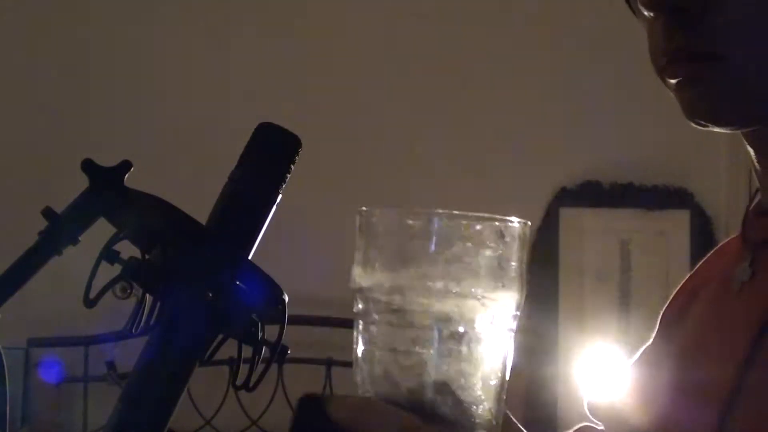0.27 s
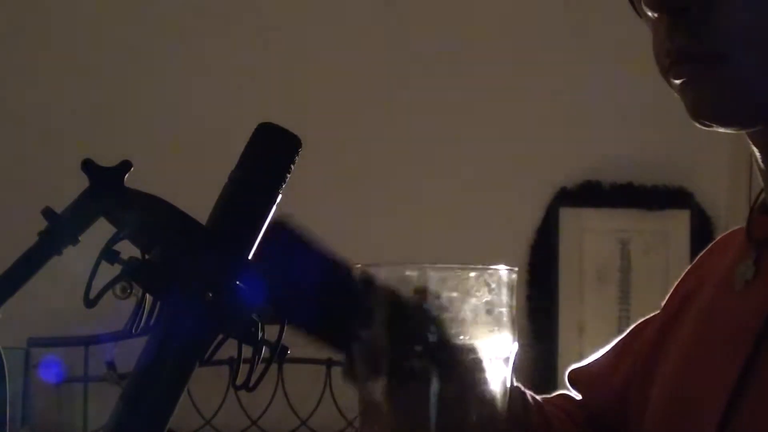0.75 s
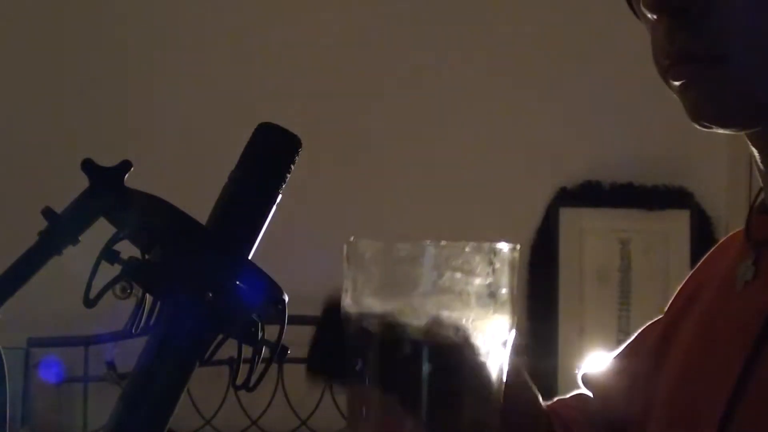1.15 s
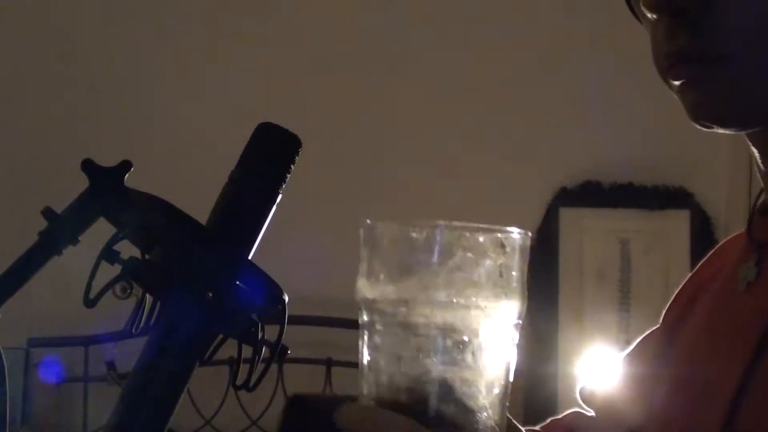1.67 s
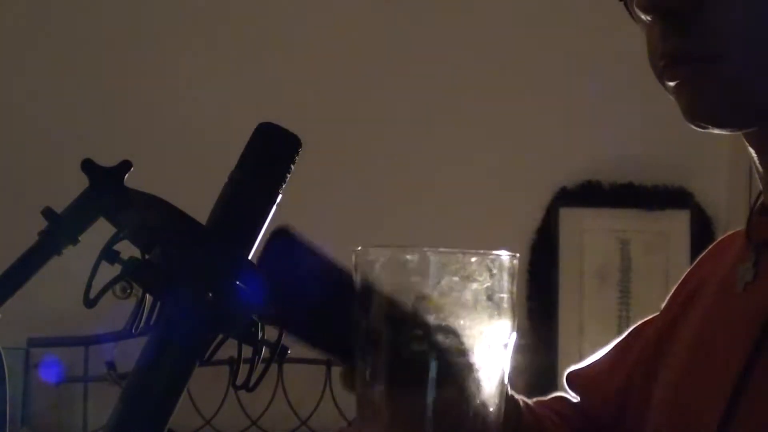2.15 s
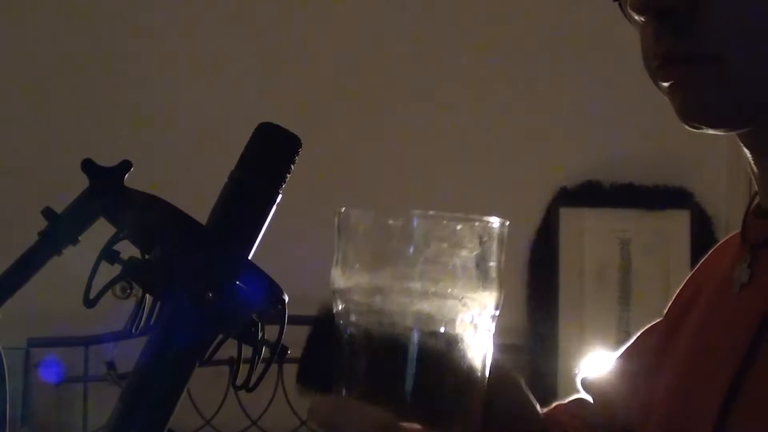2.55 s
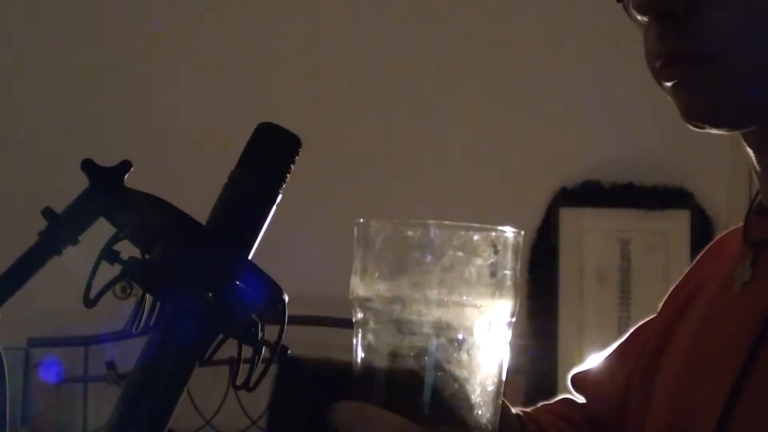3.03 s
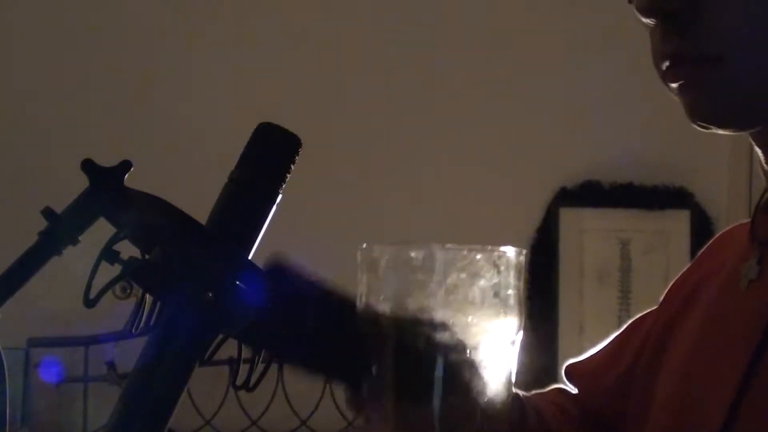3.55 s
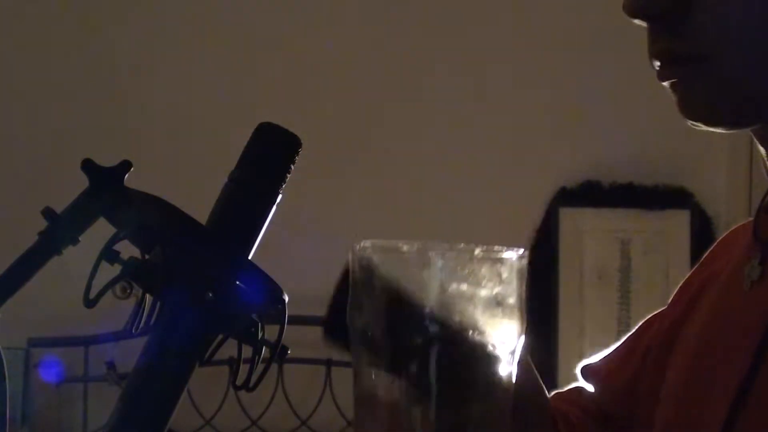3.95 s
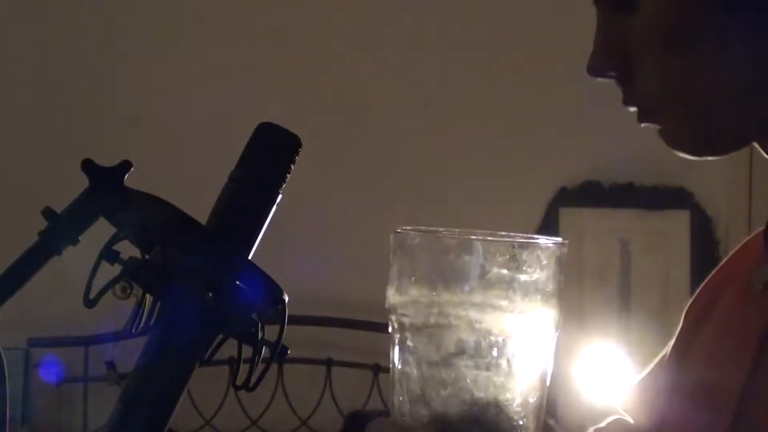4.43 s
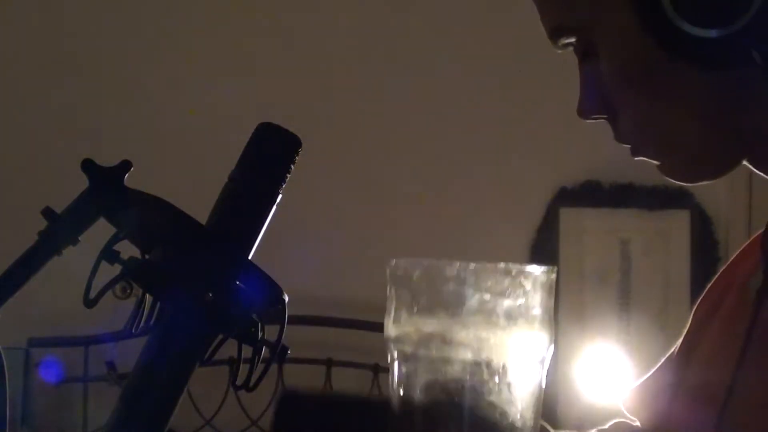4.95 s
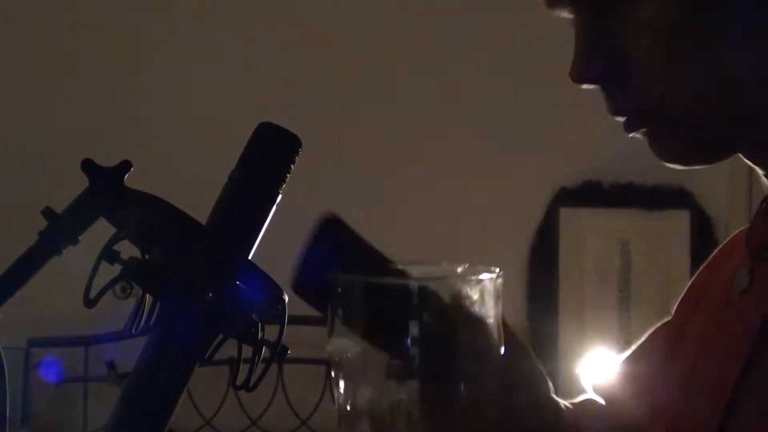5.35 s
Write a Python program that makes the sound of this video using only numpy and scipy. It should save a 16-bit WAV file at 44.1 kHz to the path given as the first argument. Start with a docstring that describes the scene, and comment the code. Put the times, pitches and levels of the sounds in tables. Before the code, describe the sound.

Close up in a quiet, small room, a hard slab is shaken in and out of a hand-held pint glass. The sound opens mid-rattle, with fast clatter until 0.1 s and an exit tap near 0.17 s. Then a cycle repeats roughly every 0.7 s: a tap on the wall at 0.52, 1.21, 1.92, 2.65, 3.30, 3.97, 4.65 and 5.31 s, a sharper rim strike about 0.07 s later, a loose burst of rattles with gritty sliding, and a tap or bouncing double tap on the way out. Rattles are strongest around 2.8, 3.5, 4.15 and 5.5 s; the shake at 4.7 s is sparser. Every hit combines a dry crack, woody mid-pitched knock, hollow air thump and short bright glass ring, always at the same pitches and often choked by the next contact. Faint low hums glide briefly at 0.7, 1.4 and 2.1 s. Soft low room hush continues underneath; the end comes during rattling.

```python
"""Slab shaken in a pint glass

Quiet room, microphone close to a hand-held pint glass; a small hard slab is shaken in and out of it.
Each shake it taps the wall going in, strikes the rim, rattles and slides, and taps the wall coming out.
Contacts damp and renew decaying glass modes, crack as noise bursts, knock slab and air resonances and puff
air out of the mouth; sliding is patchy noise, hums are gliding sines, and hush and room tail are shaped noise."""
import sys
import numpy as np
from scipy import signal
from scipy.fft import rfft, irfft, next_fast_len
from scipy.io import wavfile
from scipy.ndimage import uniform_filter1d, map_coordinates

SR = 44100
rng = np.random.default_rng(int(sys.argv[2]) if len(sys.argv) > 2 else 0)


def wrap_up_sound(samples):
    """Save the sound to the file named by the first command line argument, as 16-bit audio."""
    columns = np.atleast_2d(samples).T
    # keep every value between -1 and 1, then stretch to whole-number steps
    tamed = np.clip(columns, -1, 1)
    steps = np.round(tamed * 32767).astype(np.int16)
    wavfile.write(sys.argv[1], SR, steps)


N = 246500  # length in samples


def amp(db):
    """Gain of a dB value."""
    return 10 ** (np.asarray(db) / 20)


def unit(x):
    """x at rms 1."""
    return x / np.sqrt(np.mean(x ** 2) + 1e-20)


def along(points, hz):
    """Values at hz, interpolated between (Hz, value) points on a log frequency axis."""
    point_hz, value = np.transpose(points)
    return np.interp(np.log(hz + 1), np.log(point_hz + 1), value)


def filtered(x, response):
    """x times a complex response of frequency, zero-padded so that the end does not wrap round."""
    m = next_fast_len(len(x) + 8192)
    hz = np.fft.rfftfreq(m, 1 / SR)
    return irfft(rfft(x, m) * response(hz), m)[:len(x)]


def resonances(modes):
    """Causal response of (Hz, width Hz, dB) modes, added with alternating sign."""
    def response(f):
        total = 0
        for k, (centre, width, db) in enumerate(modes):
            band = 1j * f * width
            total = total + (-1) ** k * amp(db) * band / (centre * centre - f * f + band)
        return total
    return response


def drift(rate):
    """A random curve of straight lines between knots, rate knots a second."""
    knots = rng.standard_normal(int(N * rate / SR) + 4)
    return map_coordinates(knots, [np.arange(N) * rate / SR], order=1)


def noise(spectrum, patchy_db):
    """Coloured noise of rms 1 with time-frequency patches of random gain."""
    z = signal.stft(rng.standard_normal(N + SR // 10), nperseg=512)[2]
    field = uniform_filter1d(rng.standard_normal(z.shape), size=6, axis=0)
    field = uniform_filter1d(field, size=6, axis=1)
    x = signal.istft(z * amp(patchy_db * unit(field)), nperseg=512)[1][:N]
    return unit(filtered(x, lambda hz: amp(along(spectrum, hz))))


# The quiet room behind the glass. Each row: frequency in Hz, relative level in dB per Hz.
HUSH_SPECTRUM = [(12, -65), (20, 0.5), (85, -3.5), (308, -15.5), (374, -16.5), (553, -26), (794, -21.5),
                 (1140, -15), (2360, -29), (3580, -35.5), (4480, -29), (8500, -42.5), (15700, -41)]
HUSH_DB = -61.5  # rms level


def hush():
    """Steady background of the room: patchy noise, coloured by the hush spectrum."""
    return amp(HUSH_DB) * noise(HUSH_SPECTRUM, patchy_db=1)


# The walls around glass and microphone. Each row: frequency in Hz, time to fade by 60 dB in seconds.
ROOM_FADING = [(150, 0.13), (700, 0.16), (2000, 0.31), (5000, 0.24), (13000, 0.16)]


def room(x):
    """Each frequency of the tail dies at its own speed; the glass moves, so the tail keeps changing."""
    out, hop = np.zeros(N + 2 * SR), SR // 5
    fade = np.hanning(2 * hop + 1)[:-1]
    padded = np.pad(x, (hop, 2 * hop))
    for at in range(0, N + hop, hop):
        # a fresh random tail for each overlapping stretch
        hz, t, z = signal.stft(rng.standard_normal(SR // 2), SR, nperseg=256)
        fading = amp(-60 * t / along(ROOM_FADING, hz)[:, None])
        tail = signal.istft(z * fading, SR, nperseg=256)[1]
        wet = signal.fftconvolve(padded[at:at + 2 * hop] * fade, tail / np.linalg.norm(tail))
        out[at:at + len(wet)] += wet
    return out[hop - 150:][:N]  # the walls answer a few ms late


# Short low hums at the mouth of the glass as the slab half closes it.
# Each row: start and end in seconds, first and last frequency in Hz, peak level in dB before the waver.
MOUTH_HUMS = [(0.704, 0.758, 345, 260, -51.5), (1.383, 1.439, 227, 340, -53), (2.078, 2.145, 350, 300, -59)]


def hums():
    """Soft gliding tones of the half-closed air space, wavering in level."""
    out = np.zeros(N)
    for start, end, first_hz, last_hz, db in MOUTH_HUMS:
        n = round((end - start) * SR)
        phase = 2 * np.pi * np.cumsum(np.linspace(first_hz, last_hz, n)) / SR
        swell = np.hanning(n) ** 0.16  # nearly flat, with short ends
        out[round(start * SR):][:n] += amp(db) * swell * np.sin(phase)
    return out * amp(3 * drift(90))


# The slab sliding on the glass, close up. Each row: start, loudest moment and end in seconds,
# low rub level in dB, relative grit level in dB. A row that ends before its start stays silent;
# one that ends before its loudest moment is cut off while rising.
SLAB_SLIDES = [(0.597, 0.653, 0.75, -47, -59.5), (1.38, 1.472, 1.45, -58, -64.5),
               (2.002, 2.037, 2.145, -49.5, -59), (2.72, 2.883, 2.6, -62, -64),
               (3.359, 3.38, 3.43, -50, -49), (4.073, 4.062, 4.13, -48, -50),
               (4.48, 4.48, 5.05, -64.5, -89), (4.737, 4.75, 4.76, -68, -62), (5.38, 5.406, 5.23, -51, -81)]
# Colour of the low rub. Each row: frequency in Hz, relative level in dB per Hz.
RUB_SPECTRUM = [(200, -16), (450, -11), (750, -1), (1050, -7), (1380, -4.5), (1800, -15.5), (3000, -25)]
# Colour of the grit. Each row: frequency in Hz, relative level in dB per Hz.
GRIT_SPECTRUM = [(1500, -44), (3000, 7), (5000, 6), (7500, -2), (10000, -12), (13000, -0.5), (16000, -20)]
SLIDE_START_DB, RUB_END_DB, GRIT_END_DB = -10.5, -12, -12  # relative to the loudest moment


def sliding():
    """Friction: a rough low rub, and grit that keeps the glass modes faintly alive."""
    t = np.arange(N) / SR
    gain = np.zeros((2, N))
    for *times, rub_db, grit_db in SLAB_SLIDES:
        for row, db, end_db in [(0, rub_db, RUB_END_DB), (1, grit_db, GRIT_END_DB)]:
            levels = [db + SLIDE_START_DB, db, db + end_db]
            gain[row] += amp(np.interp(t, times, levels, left=-120, right=-120))
    rub_gain, grit_gain = uniform_filter1d(gain, size=400, axis=1)
    grains = amp(4.5 * drift(500) + 3 * drift(60))  # fine and coarse roughness
    wall = resonances([(hz, 60, 0) for family in GLASS_HZ[1:] for hz in family])
    scrape = grains * noise(GRIT_SPECTRUM, patchy_db=2.5)
    scrape = unit(scrape) + 2.5 * unit(filtered(scrape, wall))
    rub = unit(grains * noise(RUB_SPECTRUM, patchy_db=-0.5))
    return rub_gain * rub + grit_gain * scrape


# Wall taps going in. Each row: time in seconds, then relative levels in dB of crack, knock, oval ring,
# three-lobed ring and bright ring.
WALL_TAPS_IN = [(.5197, -27, -20.5, -46, -40, -39.5), (1.2147, -24, -18, -43, -35.5, -36),
                (1.9213, -25.5, -22, -46, -38.5, -32.5), (2.6461, -24, -15.5, -55, -38, -35),
                (3.2962, -25.5, -18.5, -40.5, -42, -43), (3.9717, -29, -19.5, -48, -48, -38.5),
                (4.6504, -27.5, -19.5, -43, -40.5, -33.5), (5.3132, -28.5, -17.5, -40.5, -36, -35.5)]
# Rim strikes. Each row: time in seconds, then relative levels in dB of crack, knock, oval ring,
# three-lobed ring and bright ring.
RIM_STRIKES = [(.5862, -21, -18, -43.5, -35.5, -29.5), (1.2686, -22, -21, -44, -34, -30),
               (1.9885, -22.5, -30, -56, -36, -34.5), (2.71, -23, -15.5, -37, -33.5, -30.5),
               (3.366, -23.5, -16, -41, -34, -29), (4.0488, -21.5, -16.5, -43, -45, -33),
               (4.729, -24, -20, -41, -44, -33), (5.379, -21.5, -18.5, -47, -36, -32.5)]
# Wall taps coming out, with their bounces. Each row: time in seconds, then relative levels in dB of crack,
# knock, oval ring, three-lobed ring and bright ring.
WALL_TAPS_OUT = [(.166, -25.5, -55, -41.5, -52, -34.5), (.1811, -45, -18.5, -44, -46.5, -40.5),
                 (.9093, -28.5, -61, -66, -51, -35.5), (.9157, -28, -62, -45.5, -51, -46),
                 (1.6097, -23.5, -48, -41, -49, -37.5), (1.6287, -58, -19, -54.5, -42.5, -64),
                 (2.2905, -28.5, -19, -61, -50, -38.5), (2.2978, -27.5, -50, -45, -45, -46),
                 (2.3172, -57, -18, -47.5, -42.5, -37.5), (3.0685, -20, -26, -39.5, -52.5, -30),
                 (3.0955, -40, -17, -41, -49, -42), (3.6793, -23.5, -17.5, -41, -46, -28.5),
                 (3.6975, -32, -17, -40.5, -44, -41), (4.3074, -22.5, -64, -55, -86, -28.5),
                 (4.346, -31, -39, -45, -67, -42), (4.3605, -51, -20.5, -49, -71, -43.5),
                 (4.9956, -27, -78, -53, -71, -39), (5.0128, -41, -73, -58, -80, -71)]
# Rattles inside the glass. Each row: time in seconds, then relative levels in dB of crack, knock,
# oval ring, three-lobed ring and puff.
INNER_RATTLES = [(.0005, -32, -48, -43.5, -41.5, -60), (0.0137, -26, -20.5, -35, -37.5, -33.5),
                 (0.0378, -29.5, -41, -51, -41, -41), (0.0468, -39, -30, -48, -48, -65),
                 (0.066, -25.5, -56, -48, -49, -35.5), (.0897, -39, -43, -43, -46.5, -45),
                 (.1082, -52, -47, -41, -52, -53), (0.6074, -53.5, -25, -45, -74, -44.5),
                 (.616, -43, -42, -43.5, -69, -44), (0.6834, -52, -28.5, -52, -57, -42),
                 (.779, -40.5, -31, -72, -57.5, -41.5), (.812, -29.5, -50, -43, -47.5, -39.5),
                 (0.8236, -25.5, -52, -50.5, -44, -33.5), (0.848, -41, -59, -41.5, -42, -71),
                 (1.2873, -52, -19, -40.5, -50, -40), (1.3187, -34, -16.5, -42, -57, -37.5),
                 (1.3434, -28.5, -20, -52, -65.5, -39), (1.3648, -29.5, -20, -42, -69, -34),
                 (1.3759, -36, -33, -32.5, -64, -37.5), (1.3821, -47, -35.5, -46.5, -58, -44),
                 (1.463, -58, -42, -51, -63, -46), (1.495, -31.5, -55, -51, -52, -39),
                 (1.5043, -43, -33, -53.5, -53, -43), (2.0137, -49, -19.5, -48, -51, -41.5),
                 (2.1582, -35.5, -38, -50, -52, -41), (2.1715, -31, -53, -45, -58, -50),
                 (2.1769, -35.5, -62, -50, -50, -36.5), (2.202, -35.5, -38.5, -41.5, -56, -44),
                 (2.219, -58, -55, -47.5, -55, -42), (2.2304, -45, -29, -50.5, -53, -49),
                 (2.728, -30, -45, -48, -53, -40), (2.769, -35, -16, -48, -46, -38),
                 (2.7871, -27.5, -36, -38.5, -56, -31.5), (2.823, -25.5, -36, -36.5, -42.5, -30.5),
                 (2.8532, -28, -46, -38, -45, -36), (2.8733, -33, -48, -44, -59, -42),
                 (2.891, -51, -60, -43, -54, -39), (2.897, -34, -43, -47, -49, -38.5),
                 (2.9114, -56, -65, -51.5, -45, -43), (3.3837, -48, -36, -44, -45, -40.5),
                 (3.3997, -43.5, -20, -40, -50, -42.5), (3.4354, -25.5, -14.5, -42, -50.5, -35),
                 (3.4677, -22.5, -24, -34, -60, -30), (3.4954, -25.5, -20, -33, -39, -35.5),
                 (3.5303, -32, -39, -35.5, -41, -39), (3.545, -27.5, -47, -40.5, -45, -36),
                 (3.573, -46, -53, -40, -46.5, -44.5), (4.0683, -40, -19, -46, -49, -44.5),
                 (4.0875, -44, -34, -40.5, -49, -44), (4.1227, -26.5, -12, -42, -50, -38),
                 (4.1548, -24, -22, -39, -38, -33.5), (4.1887, -26.5, -37, -66, -53.5, -39),
                 (4.533, -38, -25, -52, -80, -58), (4.7474, -35, -22, -55, -39, -50),
                 (4.797, -40, -28, -69, -39, -45), (4.807, -23, -38, -49, -37.5, -41),
                 (4.8242, -38, -80, -50, -49, -41.5), (5.413, -31, -29, -41.5, -48, -40.5),
                 (5.4418, -25.5, -12.5, -47, -70, -36), (5.4787, -21, -17, -36, -38, -31.5),
                 (5.5044, -27, -59, -40, -37.5, -39), (5.52, -26.5, -54, -48, -45.5, -36.5)]
# How each kind of contact shares its bright ring. Columns: the five upper mode families, relative levels in dB.
IN_SHARE = [-5, 0.5, -6, -2.5, -31]
STRIKE_SHARE = [1, -24, 1.5, -16, -8]
OUT_SHARE = [-5, -0.5, -18.5, -6, -21]
RATTLE_SHARE = [1, -4, -4, -60, -2]
RATTLE_RING_DB = -19  # a rattle's bright ring relative to its crack
IN_PUFF_DB, STRIKE_PUFF_DB, OUT_PUFF_DB = -22, -17.5, -30  # puff relative to the crack
# extra fading of the two lowest families while the slab leans on the wall
IN_GRIP_DB_PER_S, STRIKE_GRIP_DB_PER_S = 188, 245


def contacts():
    """All contacts in time order: seconds, crack, knock, puff and seven ring families in dB, grip in dB/s."""
    kinds = [(WALL_TAPS_IN, IN_PUFF_DB, IN_SHARE, IN_GRIP_DB_PER_S),
             (RIM_STRIKES, STRIKE_PUFF_DB, STRIKE_SHARE, STRIKE_GRIP_DB_PER_S),
             (WALL_TAPS_OUT, OUT_PUFF_DB, OUT_SHARE, 0)]
    rows = []
    for table, puff_db, share_db, grip in kinds:
        for s, crack, knock, oval, lobed, bright in table:
            upper = np.add(bright, share_db)
            rows.append((s, crack, knock, crack + puff_db, oval, lobed, *upper, grip))
    for s, crack, knock, oval, lobed, puff in INNER_RATTLES:
        upper = np.add(crack + RATTLE_RING_DB, RATTLE_SHARE)
        rows.append((s, crack, knock, puff, oval, lobed, *upper, 0))
    return np.array(sorted(rows))


# Colour of hard surfaces cracking together. Each row: frequency in Hz, relative level in dB.
CRACK_SPECTRUM = [(600, -18.5), (1100, 4), (2300, 0), (3500, -4.5), (6000, -3.5), (7800, -8.5), (9800, -16),
                  (11400, -14.5), (12300, -8.5), (13300, -12), (16000, -22)]
# The slab's damped modes. Each row: frequency in Hz, width in Hz, relative level in dB.
SLAB_MODES = [(848, 310, -5.5), (1475, 200, 1.5), (2160, 86, -1), (2420, 580, -33)]
# The air in the glass. Each row: frequency in Hz, width in Hz, relative level in dB.
AIR_MODES = [(730, 206, 0.5)]
# Faint ticks that leave the ringing alone. Each row: time in seconds, crack and knock relative levels in dB.
FAINT_TICKS = [(1.82, -59, -62), (1.851, -53.5, -60), (3.272, -63, -60), (4.462, -55, -60),
               (4.4834, -35.5, -60), (4.5625, -45, -23), (5.131, -50.5, -28), (5.184, -50, -58),
               (5.213, -42, -31.5), (5.228, -55, -48)]
TICK_PUFF_DB = -30  # relative to the crack


def blows():
    """Crack of hard surfaces, knock of the slab, push on the air in the glass, and puff out of the mouth."""
    cracks, knocks, pushes, puffs = np.zeros((4, N + SR))
    t = np.arange(SR // 10) / SR
    crack_noise = noise(CRACK_SPECTRUM, patchy_db=-3)
    ticks = [(s, crack, knock, crack + TICK_PUFF_DB) for s, crack, knock in FAINT_TICKS]
    table = [*contacts()[:, :4], *ticks]
    chatter = rng.standard_normal((len(table), len(t)))

    def hump(late, length):
        """A smooth pulse, its delay and length in seconds."""
        return np.sin(np.pi * np.clip((t - late) / length, 0, 1)) ** 2

    suck = hump(.0004, .001) + .4 * hump(.0019, .001)  # the bottom of the glass sends the pulse back
    swell = t / .005 * np.exp(-t / 0.0087)
    puff = swell * suck.sum() / swell.sum() - suck  # air is drawn in sharply and flows back slowly
    decay = amp(-60 * t / 0.013) + 0.14 * amp(-60 * t / 0.049)
    snap = (1 - np.exp(-t / 0.000087)) * decay
    for k, (s, crack_db, knock_db, puff_db) in enumerate(table):
        burst = np.roll(crack_noise, -k * len(t) // 5)[:len(t)]
        at = round(s * SR)
        force = hump(.0003, .0006) + .11 * chatter[k] * amp(-60 * t / .07)
        push_db = 0.9 * knock_db + 0.51 * puff_db + 11.5  # the cavity sounds when air moves
        cracks[at:][:len(t)] += amp(crack_db - 4.0) * burst * snap
        knocks[at:][:len(t)] -= amp(knock_db - 5.0) * force
        pushes[at:][:len(t)] -= amp(push_db) * force
        puffs[at:][:len(t)] += amp(puff_db + 9.5) * puff
    slab = filtered(knocks[:N], resonances(SLAB_MODES))
    air = filtered(pushes[:N], resonances(AIR_MODES))
    return cracks[:N] + slab + air + puffs[:N]


# Glass mode frequencies in Hz. Each row: a family that a contact excites together, in order the oval rim pair,
# three-lobed rim pair, lowest wall pair, second wall mode, four-lobed rim pair, high wall and high rim modes.
GLASS_HZ = [
    [1277, 1300],
    [2916, 2961],
    [4212, 4240],
    [4838],
    [5168, 5206],
    [7235, 7547, 10734, 8990],
    [8096, 11610, 13095, 14170, 14481, 14804, 15548, 9685],
]
# The same modes, row for row. Each entry: relative level in the family in dB, time to fade by 60 dB in seconds.
GLASS_MODES = [
    [(-2, 0.48), (2, 0.041)],
    [(0.5, 0.44), (-43, 0.11)],
    [(-8, .13), (-8, .09)],
    [(0, 0.098)],
    [(-1, .24), (-4, .1)],
    [(-1.5, 0.067), (-5, 0.057), (-15.5, 0.13), (-21, 0.1)],
    [(-1.5, 0.14), (1, 0.051), (-5.5, 0.023), (-13, 0.1), (-24, 0.092), (-34, .08), (-14.5, 0.079),
     (-41, 0.11)],
]
DAMPING_DB = -3.5  # what a contact leaves of the upper families


def ringing():
    """Each contact resets the two lowest families and adds to what it leaves of the upper ones, at a new phase."""
    table = contacts()
    t = np.arange(N) / SR
    last = np.maximum(np.searchsorted(table[:, 0], t) - 1, 0)  # latest contact at each sample
    since = t - table[last, 0]
    gaps = np.diff(table[:, 0])
    out = np.zeros(N)
    for k, (family_db, family_hz, family) in enumerate(zip(table[:, 4:].T, GLASS_HZ, GLASS_MODES)):
        lowest = k < 2
        for hz, (db, t60) in zip(family_hz, family):
            draw = rng.standard_normal((len(table), 2))
            scatter_db = .8 * draw[:, 0]
            size = amp(family_db + db + scatter_db)
            if not lowest:
                for i, gap in enumerate(gaps):
                    left = size[i] * amp(DAMPING_DB - 60 * gap / t60)
                    size[i + 1] = np.hypot(size[i + 1], left)
            start = size * np.exp(.7j * np.cumsum(draw[:, 1]))
            grip = table[last, -1] * lowest
            swing = start[last] * amp(-(60 / t60 + grip) * since)
            swing = signal.lfilter([.03], [1, .03 - 1], swing)  # the wave needs a moment to run round the rim
            # the glass turns in the hand: higher modes have narrower lobes and waver more
            waver = (hz / 14000) ** .75
            swing *= 1 + 0.41 * waver * (drift(90) + 1j * drift(90))
            out += (swing * np.exp(2j * np.pi * hz * t)).real
    return out


def scene():
    """Glass, room and background hush."""
    ring = ringing()
    hits = blows() + sliding() + hums()
    wet = room(amp(-11) * ring + amp(-5.5) * hits)
    return (ring + hits + wet + hush())[None]


# The recorder's top end. Each row: frequency in Hz, gain in dB.
TREBLE_GAIN = [(15600, 0.5), (16000, -22), (16800, -30)]
TOP_HZ = 16800  # band limit


def record(dry):
    """The recorder's treble falls away just under its band limit."""
    return filtered(dry[0], lambda hz: amp(along(TREBLE_GAIN, hz)) * (hz < TOP_HZ))[None]


dry = scene()
out = record(dry)
wrap_up_sound(out)
```